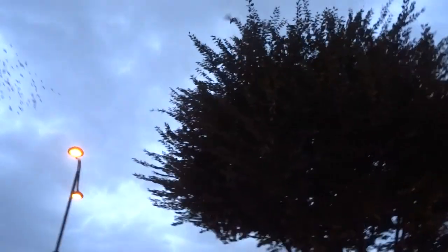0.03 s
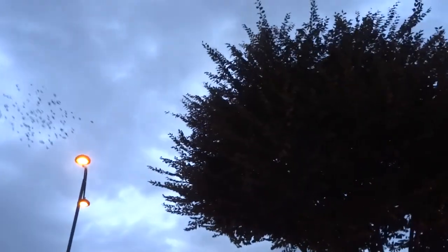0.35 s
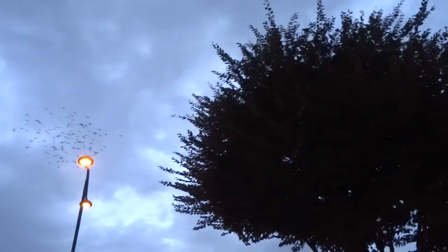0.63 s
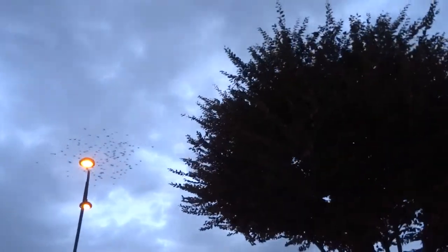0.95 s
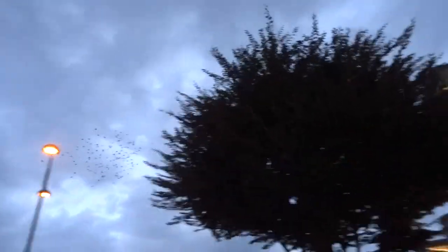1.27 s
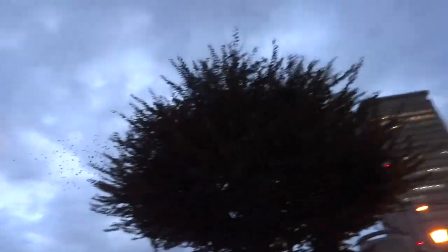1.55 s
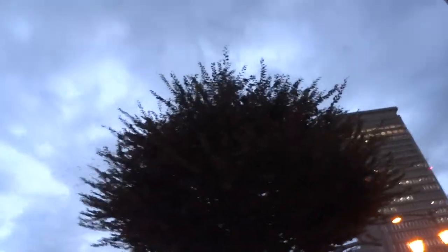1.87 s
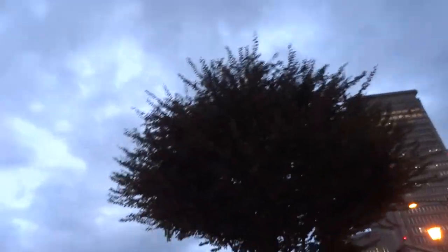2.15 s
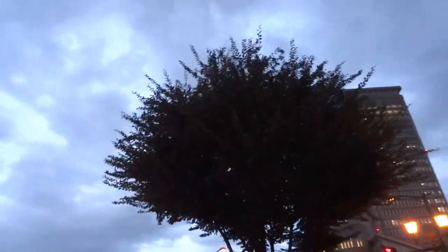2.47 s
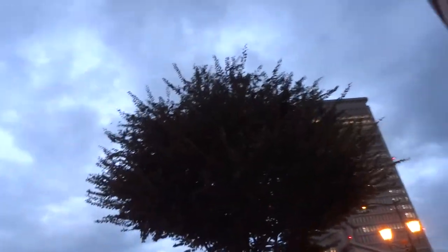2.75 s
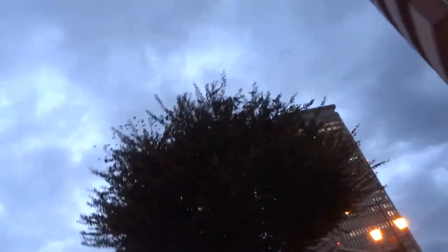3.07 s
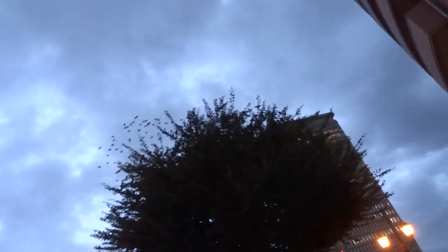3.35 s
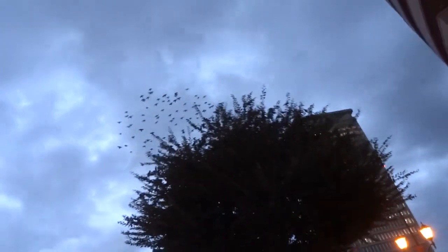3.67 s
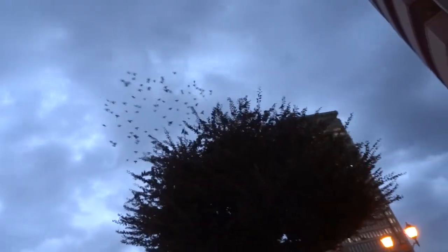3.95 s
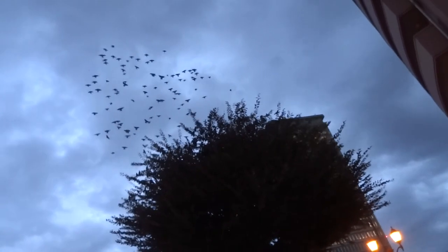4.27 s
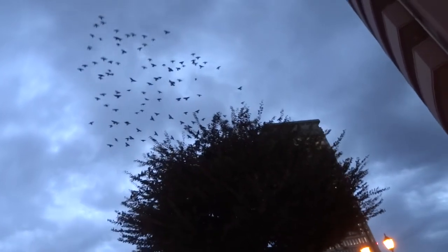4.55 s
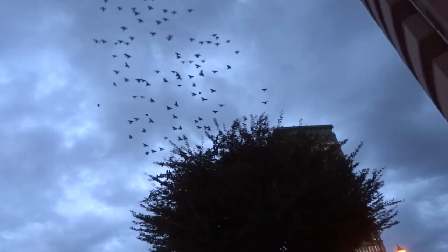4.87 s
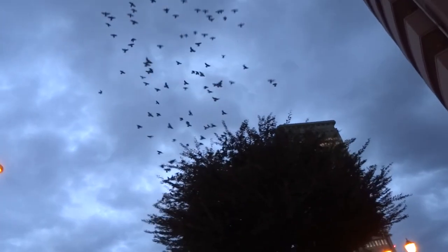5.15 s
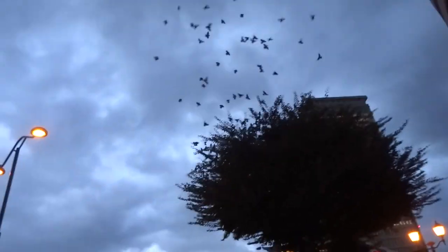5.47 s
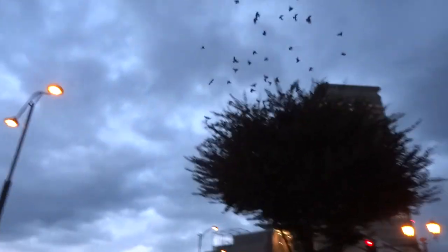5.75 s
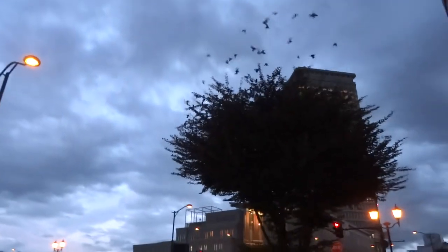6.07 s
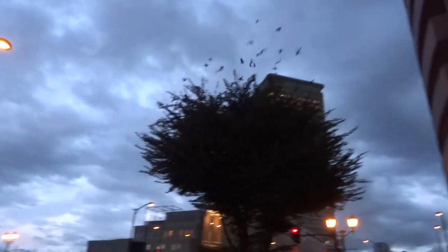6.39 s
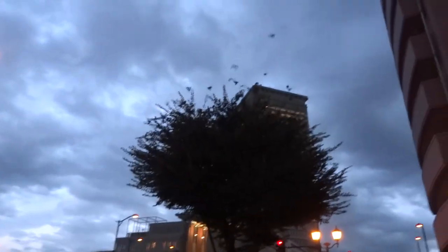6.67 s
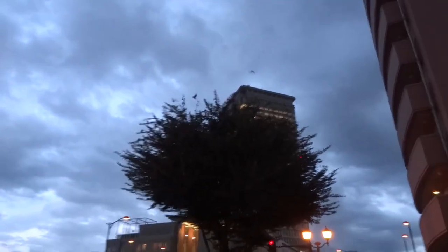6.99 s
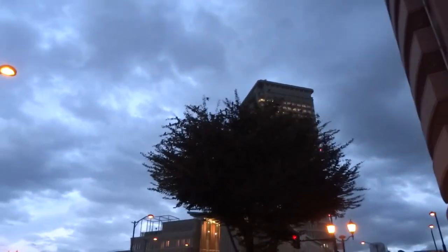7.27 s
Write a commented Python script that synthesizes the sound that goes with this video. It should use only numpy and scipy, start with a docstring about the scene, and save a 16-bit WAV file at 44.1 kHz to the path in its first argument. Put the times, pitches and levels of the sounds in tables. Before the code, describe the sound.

A steady, shrill chatter from a big flock of small birds fills a city street, blurred by echoes off the buildings. Single closer chirps poke through, with a faint hiss of wings and leaves and a low murmur of traffic. Midway, brakes squeal faintly, soft gusts rumble on the microphone and a hand knocks it lightly several times. The birds stay the loudest sound throughout.

```python
"""A dense, rasping chatter: hundreds of small birds calling at once in a street tree at dusk.
Each chirp is a gliding whistle roughened by the syrinx; echoes off the house fronts blur them together.
A few nearer birds stand out, and wings and leaves hiss faintly. Traffic murmurs behind with a faint
brake squeal, light gusts rumble on the microphone and a hand bumps the camera."""
import sys
import numpy as np
from scipy import signal
from scipy.fft import rfft, irfft, next_fast_len
from scipy.io import wavfile
from scipy.ndimage import uniform_filter1d, map_coordinates

SR = 44100
rng = np.random.default_rng(int(sys.argv[2]) if len(sys.argv) > 2 else 0)


def bounce(signal):
    """Save signal as a 16-bit WAV file at the path given by the first command-line argument."""
    frames = np.transpose(np.atleast_2d(signal))
    limited = np.clip(frames, -1, 1)
    pcm = np.round(limited * 32767).astype(np.int16)
    wavfile.write(sys.argv[1], SR, pcm)


N = 332073

AHEAD = np.array([[1], [0]])  # a sound straight ahead has mid and no side


def flock(mood_db, surge_db, throat_hz=3200, shrill_hz=6800, waver_db=0.41):
    """The whole tree: as the birds surge, their chatter grows louder and shriller."""
    # tone of all voices together: freq_hz, level_db
    voice_spectrum = [(900, -54), (1500, -11.5), (1900, -4.5), (2400, 2), (3000, 2), (3900, 0.5),
                      (5000, -1.5), (6000, -4), (7400, -9), (9300, -8.5), (10900, -3.5), (12200, -16),
                      (13500, -27.5), (15800, -36)]
    rasps = crowd(7500, low_hz=1745.5, high_hz=6817, length_s=.038, rasp=.1431, sweep=.18, depth_db=12)
    peeps = crowd(1100, low_hz=2402, high_hz=6323, length_s=.02035, rasp=.042, sweep=.0408, depth_db=6.5)
    calls = rasps + amp(-6) * peeps
    blur = amp(-1.5) * rng.standard_normal((2, N))  # the farthest voices merge completely
    chatter = whitened(calls + amp(-7) * echoes(calls, segments=16))
    voices = coloured(chatter + blur, voice_spectrum)
    above = lambda hz, edge: 1 - 1 / (1 + (hz / edge) ** 10)
    throaty = steady(filtered(voices, lambda hz: 1 - above(hz, throat_hz)))
    middle = steady(filtered(voices, lambda hz: above(hz, throat_hz) - above(hz, shrill_hz)))
    shrill = steady(filtered(voices, lambda hz: above(hz, shrill_hz)))
    registers = [(throaty, -5.5, 0.47), (middle, 0, 1), (shrill, -11, 1.47)]
    return sum(amp(mood_db + trim_db + follow * surge_db + waver_db * wobble(7, N)) * band
               for band, trim_db, follow in registers)


def excitement(attack_s=.05, release_s=.055, restless_db=0.38):
    """The flock's slow mood and its quick surges, both in dB: volleys, lulls and a little chance."""
    # slow ride of the chatter: time_s, level_db
    mood = [(0.0, -19.5), (0.38, -20), (0.98, -20), (2.41, -21.5), (2.95, -22), (3.82, -22), (4.89, -21),
            (7.53, -19.5)]
    # groups of birds bursting out together: peak_s, boost_db
    volleys = [(.56, 1.8), (.8, 1), (1.16, -0.8), (1.48, 1.5), (2.18, 1), (2.5, 1.5), (3.03, 3),
               (3.25, 1.5), (3.62, 1), (4.26, 0), (5.33, 1), (5.97, 2)]
    # brief dips in the chatter: centre_s, half_width_s, depth_db
    lulls = [(1.227, .04, 2.5), (1.75, 0.05, 1.5), (2.28, .05, 2), (3.157, 0.03, 2.8), (3.367, 0.029, 2.4),
             (3.834, 0.13, 2.6), (4.53, .04, 2.5), (5.16, 0.061, 2)]
    boost_db = sum(db * swell(s, attack_s, release_s) for s, db in volleys)
    dip_db = sum(db * swell(s, width, width) for s, width, db in lulls)
    return curve(mood), boost_db - dip_db + restless_db * wobble(6, N)


def crowd(count, low_hz, high_hz, length_s, rasp, sweep, depth_db, repertoire=500):
    """Mid and side of many chirps, scattered through the crown at random times, depths and bearings."""
    pitches = low_hz * (high_hz / low_hz) ** rng.random(repertoire)
    songs = [chirp(hz, sweep * (2 * tilt - 1), length_s * np.exp(.35 * stretch),
                   rasp * np.exp(0.403 * grit), arch=sweep, trill_depth=sweep / 4)
             for hz, (tilt, stretch, grit) in zip(pitches, rng.standard_normal((repertoire, 3)))]
    pair = np.zeros((2, N))
    for i, (when, far, side) in enumerate(rng.random((count, 3))):
        pan = np.array([[1], [np.sqrt(3) * (2 * side - 1)]])
        gain = amp(-depth_db * np.sqrt(far))  # most birds sit deep in the crown
        add(pair, when * N / SR, gain * pan * songs[i % repertoire])
    return unit(pair)


def chirp(hz, glide, length_s, rasp, arch, trill_depth, overtone_db=-8):
    """One call: an arched, gliding whistle, trilled and roughened by the syrinx; bends are in octaves."""
    size = int(np.clip(length_s, .008, .3) * SR)
    progress = np.linspace(0, 1, size)
    jitter = np.interp(np.arange(size), np.arange(1024) * 16, rng.standard_normal(1024))
    trill_hz = 110 * np.exp(.5 * rng.standard_normal())
    trill = np.sin(2 * np.pi * trill_hz * np.arange(size) / SR)
    contour = glide * (progress - .5) + arch * (np.sin(np.pi * progress) - np.pi / 4)
    octaves = contour + trill_depth * trill + rasp * jitter
    phase = 2 * np.pi * np.cumsum(hz * 2 ** octaves) / SR
    voice = sum(amp(overtone_db * k) * np.sin((k + 1) * phase) for k in range(3) if (k + 1) * hz < SR / 2)
    envelope = np.abs(np.sin(np.pi * progress ** 0.56))
    return unit(voice * (1 + 0.84 * trill) * envelope)


def near_birds(trim_db=-3, echo_db=-7):
    """Single birds stand out on the near side of the crown."""
    # solo calls: start_s, pitch_hz, length_s, level_db
    solos = [(.12, 4800, .052, -24), (0.431, 2950, 0.079, -20), (.6, 4800, .08, -22),
             (.76, 4260, 0.051, -21), (0.973, 3660, 0.046, -18.5), (1.116, 5080, 0.11, -22),
             (1.446, 3400, 0.1, -23), (1.85, 4530, .06, -27), (2.326, 2900, .05, -22),
             (2.462, 3580, 0.039, -21), (2.54, 5500, .05, -22.5), (2.719, 3860, .066, -24),
             (2.783, 3440, 0.07, -22.5), (2.86, 3900, .08, -22.5), (3.215, 5200, 0.091, -25),
             (3.993, 4500, 0.078, -24), (4.692, 4100, .1, -25), (6.244, 3930, .044, -30),
             (6.39, 3730, 0.06, -27), (6.78, 4000, 0.084, -26)]
    calls = np.zeros(N)
    for s, hz, length_s, db in solos:
        call = chirp(hz, -0.0544, length_s, rasp=.09, arch=0.0615, trill_depth=0.028, overtone_db=-35)
        add(calls, s, amp(db + trim_db) * call)
    return calls * AHEAD + amp(echo_db) * echoes(calls, segments=7)


def echoes(x, segments):
    """Mid and side reverb of crown and house fronts; the birds keep moving, so the pattern changes."""
    # decay of the street: freq_hz, t60_s
    street_decay = [(500, 0.94), (4000, 0.95), (12000, 0.61)]
    out, hop = np.zeros((2, N)), N // segments
    padded = np.pad(np.atleast_2d(x), ((0, 0), (hop, 2 * hop)))
    for i in range(segments + 2):
        hz, t, noise = signal.stft(rng.standard_normal((2, SR // 4)), SR, nperseg=256)
        decay = amp(-60 * t / along(street_decay, hz)[:, None])
        tail = signal.istft(noise * decay, SR, nperseg=256)[1]
        piece = padded[:, i * hop:(i + 2) * hop] * signal.windows.cosine(2 * hop)
        add(out, (i - 1) * hop / SR, signal.fftconvolve(piece, tail / np.linalg.norm(tail[0]), axes=1))
    return out


def traffic(trim_db=1, drift_db=0.45):
    """Tyres and engines of the streets around, merged by distance into a murmur."""
    # ride of the traffic bed: time_s, level_db
    ride = [(0.0, -38), (0.02, -36), (1.05, -35), (4.32, -34), (7.53, -40.5)]
    # tone of distant traffic: freq_hz, level_db
    road_spectrum = [(20, -36), (45, -19), (80, -9.5), (130, -7), (185, -4.5), (220, 0), (295, 1.5),
                     (350, -2.5), (500, 0), (750, 1.5), (1100, -1), (1500, -4), (3000, -15), (8000, -64)]
    gain = amp(curve(ride) + trim_db + drift_db * wobble(6.6, N))
    return gain * coloured(rng.standard_normal((2, N)), road_spectrum)


def brakes(waver=0.0064):
    """Brakes squeal faintly from the road, each a thin, wavering tone."""
    # brake squeals: start_s, length_s, pitch_hz, level_db
    squeals = [(2.833, 0.081, 660, -40.5), (2.917, 0.063, 768, -39), (2.954, 0.083, 647, -42.5),
               (3.102, .3, 1016, -46), (4.099, 0.39, 1203, -42)]
    out = np.zeros(N)
    for s, length_s, hz, db in squeals:
        size = int(length_s * SR)
        phase = 2 * np.pi * np.cumsum(hz + hz * waver * wobble(90, size)) / SR
        add(out, s, amp(db) * unit(np.sin(phase) * signal.windows.tukey(size)))
    return out


def hand_bumps(attack_s=.003, t60_s=.08, roughness=0.32):
    """The hand shifts on the camera: each bump is a few dull, uneven cycles of its case."""
    # soft knocks on the case: start_s, pitch_hz, level_db
    knocks = [(3.312, 230, -25), (3.372, 260, -24), (3.888, 120, -25), (3.914, 220, -22), (5.181, 170, -24)]
    out, t = np.zeros(N), np.arange(SR // 5) / SR
    envelope = (1 - np.exp(-t / attack_s)) * amp(-60 * t / t60_s)
    for s, hz, db in knocks:
        phase = 2 * np.pi * np.cumsum(hz * np.exp(roughness * wobble(210, len(t)))) / SR
        add(out, s, amp(db) * envelope * np.sin(phase))
    return out


def wind(breeze_db=-67, gust_trim_db=-1):
    """Short gusts rumble on the microphone over a faint breeze."""
    # puffs of air: peak_s, width_s, level_db
    puffs = [(.5, .2, -48), (1.09, .093, -41), (2.233, 0.065, -45), (2.99, .12, -43), (3.376, .09, -41),
             (3.75, .45, -41), (4.006, .045, -39), (4.48, 0.31, -39), (5.21, 0.075, -39.5),
             (7.43, .06, -46)]
    # tone of the buffeting: freq_hz, level_db
    buffet_spectrum = [(20, -36), (50, -16), (90, -4.5), (150, -3.5), (250, -6.5), (400, -12), (900, -49)]
    t = np.arange(N) / SR
    breeze = amp(breeze_db + 1.5 * wobble(4.4, N))
    gusts = sum(amp(db + gust_trim_db) * np.exp(-2 * ((t - s) / width) ** 2) for s, width, db in puffs)
    return (breeze + gusts) * coloured(rng.standard_normal((2, N)), buffet_spectrum)


def rustle(trim_db=3, flutter_db=.7):
    """Wings and leaves hiss faintly above the calls."""
    # ride of the rustling: time_s, level_db
    ride = [(0.0, -50), (0.21, -48), (2.29, -58), (2.95, -56), (5.24, -62), (5.64, -48), (6.56, -60),
            (7.53, -53)]
    # tone of wings and leaves: freq_hz, level_db
    leaf_spectrum = [(2000, -22), (8000, -10), (12500, 3), (15800, -1)]
    gain = amp(curve(ride) + trim_db + flutter_db * wobble(30, N))
    return gain * coloured(rng.standard_normal((2, N)), leaf_spectrum)


def amp(db):
    """Decibels to gain."""
    return 10 ** (np.asarray(db) / 20)


def unit(x):
    """Scaled to rms 1."""
    return x / np.sqrt(np.mean(x ** 2) + 1e-20)


def steady(x, window=4001):
    """Levelled to a running rms of 1."""
    return x / np.sqrt(np.abs(uniform_filter1d(np.mean(x ** 2, 0), window)) + 1e-9)


def along(points, hz):
    """(freq_hz, value) points read on a log frequency axis."""
    freqs, values = np.transpose(points)
    return np.interp(np.log(hz + 1), np.log(freqs + 1), values)


def curve(points):
    """(time_s, value) points joined into one value per sample."""
    return np.interp(np.arange(N) / SR, *np.transpose(points))


def swell(peak_s, rise_s, fall_s):
    """A smooth hump of height 1."""
    t = np.arange(N) / SR - peak_s
    return np.exp(-(t / np.where(t < 0, rise_s, fall_s)) ** 2)


def wobble(rate, size):
    """A smooth random curve, rate knots a second."""
    knots = rng.standard_normal(int(size * rate / SR) + 4)
    return map_coordinates(knots, [np.arange(size) * rate / SR])


def filtered(x, response):
    """x through an EQ whose gain is response(hz)."""
    size = next_fast_len(N + 8192)
    return irfft(rfft(x, size) * response(np.fft.rfftfreq(size, 1 / SR)), size)[..., :N]


def coloured(pair, spectrum):
    """A mid and side pair shaped by a spectrum, at rms 1."""
    return unit(filtered(pair, lambda hz: amp(along(spectrum, hz))))


def whitened(x):
    """The same sound with a flat long-term spectrum over the birds' range."""
    freqs, power = signal.welch(x, SR, nperseg=256)
    power = power.mean(0)
    floor = amp(-60) * power.max()
    return unit(filtered(x, lambda hz: np.interp(hz, freqs, power + floor) ** -.5))


def add(track, s, sound):
    """Mixes a sound into the track from time s on."""
    start = round(s * SR)
    first, end = max(start, 0), min(start + sound.shape[-1], N)
    if end > first:
        track[..., first:end] += sound[..., first - start:end - start]


def scene(wind_side_db=-8):
    """The tree slightly to the right, the street all around; close mic ports narrow all but the wind."""
    # where the tree lies as the camera turns: time_s, bearing (-1 right to 1 left)
    tree_bearing = [(0, -0.54), (1.2, -0.41), (1.8, -.18), (3.4, -0.47), (6.7, -0.22), (7.4, -0.55)]
    # stereo width of the microphone: freq_hz, side_gain_db
    stereo_width = [(30, -22), (130, -20), (350, -23.5), (690, -18.5), (950, -14), (1300, -11.5),
                    (2150, -23.5), (3100, -18), (4700, -13.5), (6500, -18), (8600, -22), (11500, -13),
                    (15500, -27)]
    mood_db, surge_db = excitement()
    birds = flock(mood_db, surge_db) + near_birds() + rustle()
    mid, side = birds + traffic() + (brakes() + hand_bumps()) * AHEAD
    side = side + curve(tree_bearing) * birds[0]
    side = filtered(side, lambda hz: amp(along(stereo_width, hz)))
    wind_mid, wind_side = wind()
    mid, side = mid + wind_mid, side + amp(wind_side_db) * wind_side
    return np.array([mid + side, mid - side])  # left, right


def record(dry, top_hz=15800):
    """The camera keeps nothing above its band limit."""
    return filtered(dry, lambda hz: hz < top_hz)


dry = scene()
out = record(dry)
bounce(out)
```